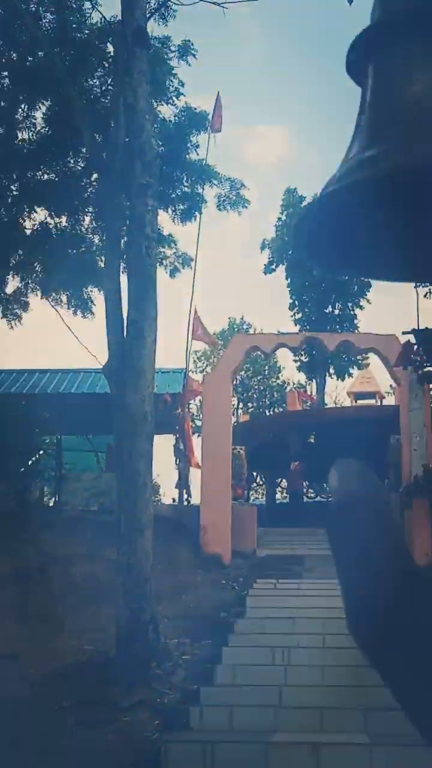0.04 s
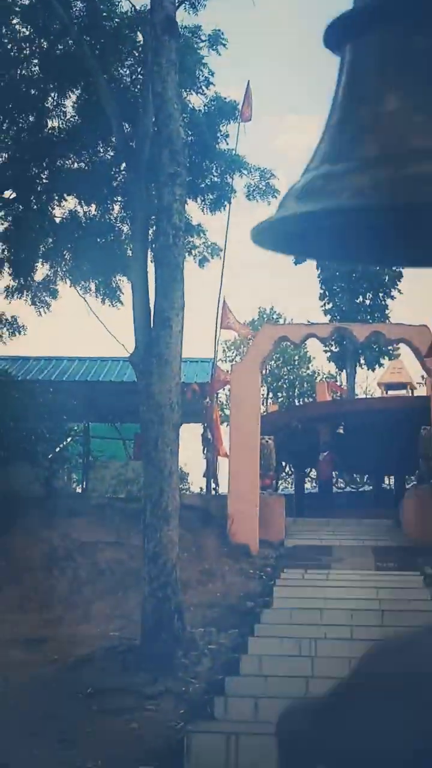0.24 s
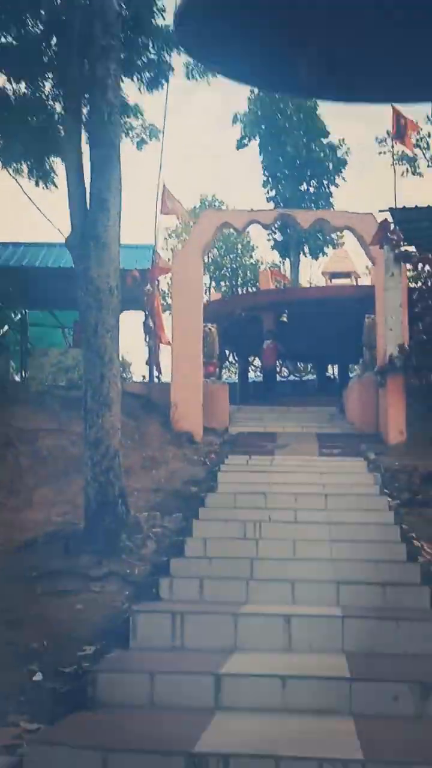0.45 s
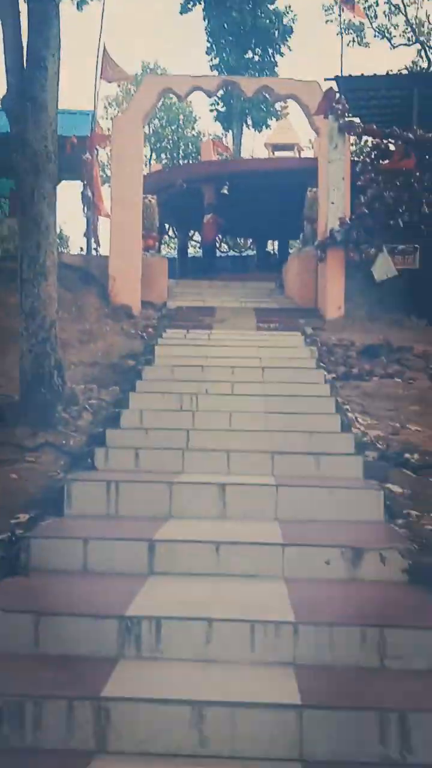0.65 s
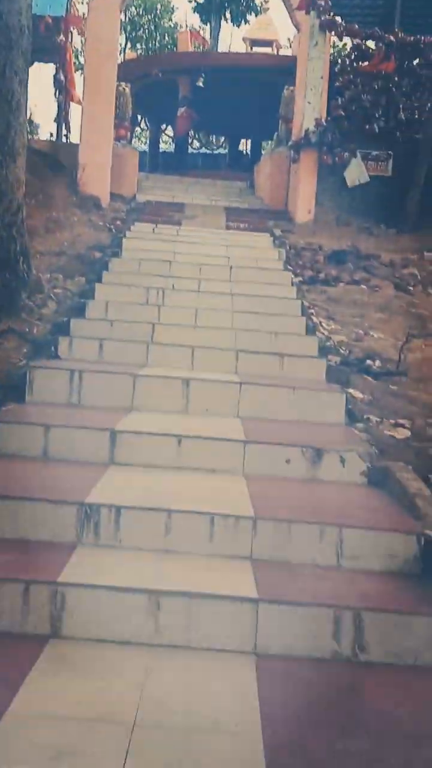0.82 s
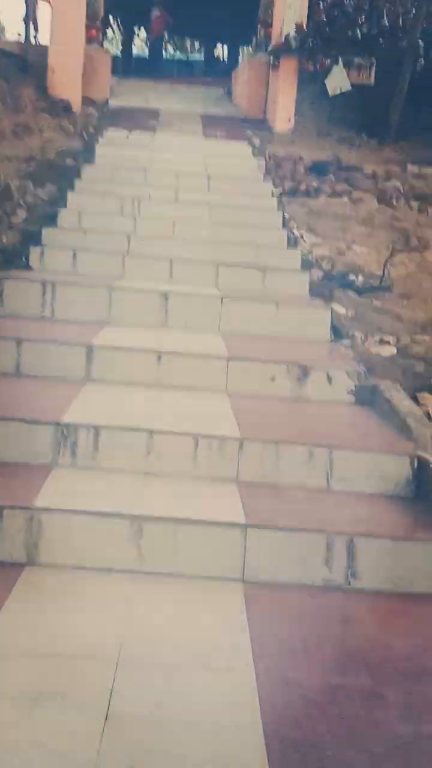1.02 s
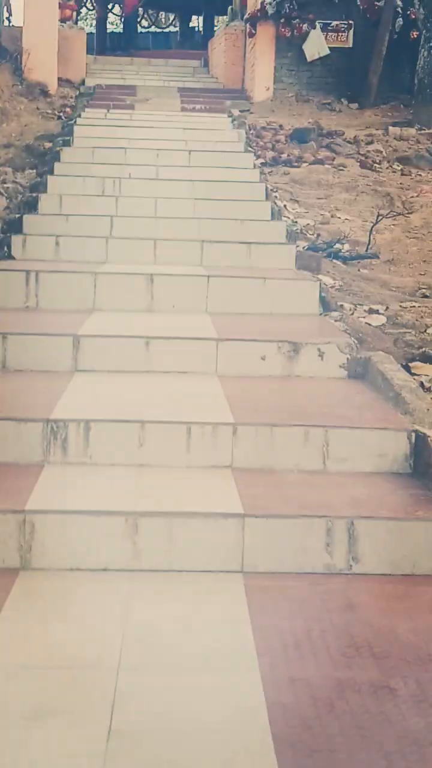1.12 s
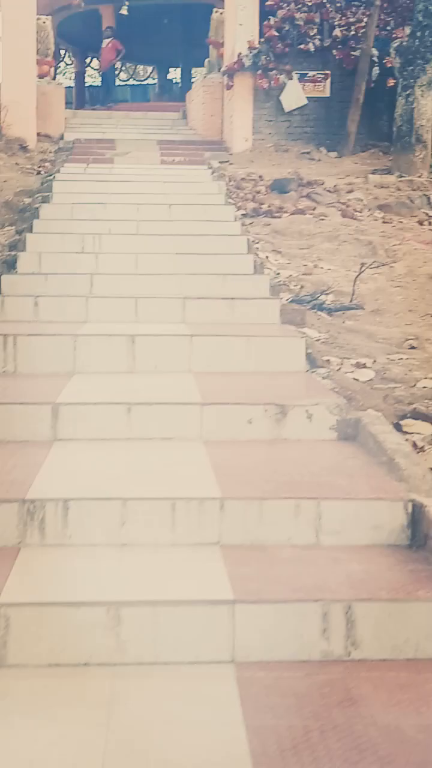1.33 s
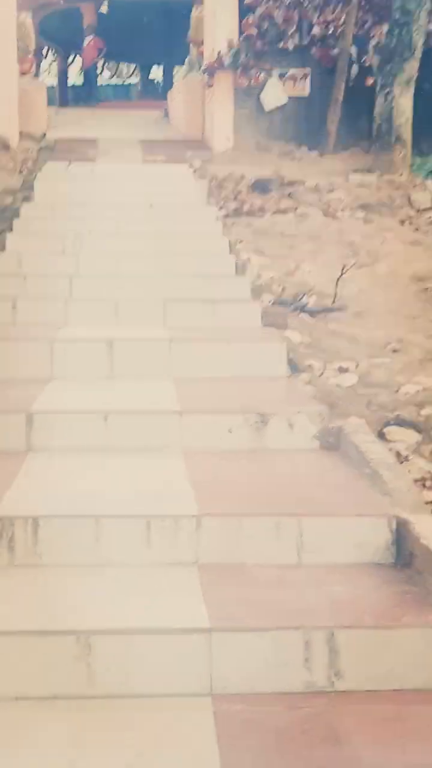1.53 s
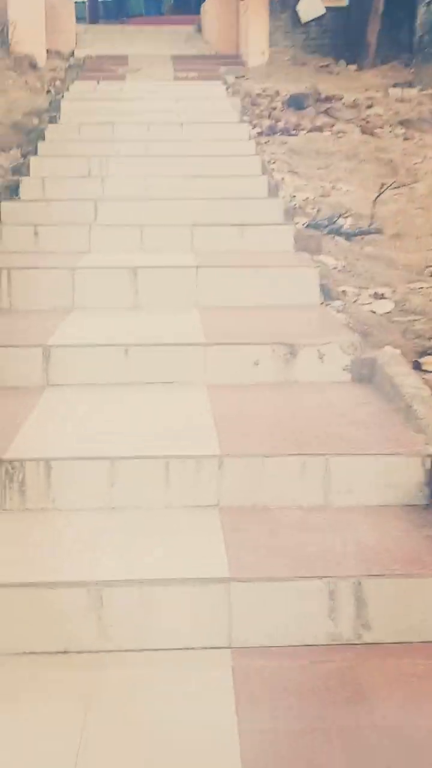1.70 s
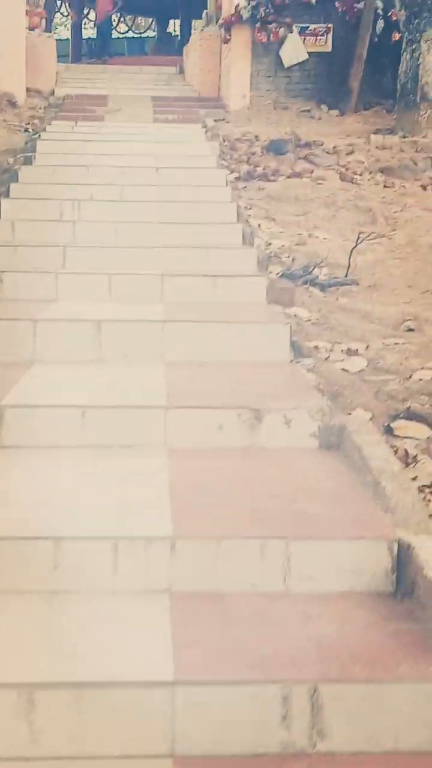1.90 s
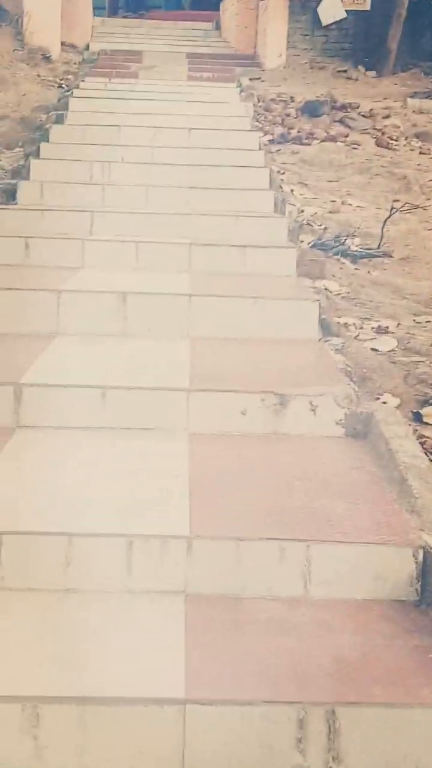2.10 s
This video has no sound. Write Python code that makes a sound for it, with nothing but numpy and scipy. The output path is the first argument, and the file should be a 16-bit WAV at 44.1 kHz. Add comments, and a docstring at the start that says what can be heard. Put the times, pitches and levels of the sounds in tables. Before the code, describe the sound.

At about 0.2 seconds a large hanging metal bell is struck once, so close that the microphone briefly overloads with a harsh rasp. Bright, throbbing tones ring until about 0.9 seconds, then a lower tone swells near 1.2 seconds and slowly fades. Faint wind and a few soft scuffs on stone lie underneath in the quiet open air, one sharper at 1.7 seconds. Quick microphone bumps come around 2.1 seconds.

```python
"""A large hanging temple bell is struck once, right beside a hand-held microphone that overloads.
The overload adds a harsh rasp and some short-lived distortion tones at the strike. The bell swings on:
its paired tones throb, bend in pitch, and swell and fade as it turns and is left behind.
Thin echoes, a few soft scuffs on stone, low wind and some bumps on the microphone sound
in the quiet open air."""
import sys
import numpy as np
from scipy import signal
from scipy.fft import rfft, irfft
from scipy.io import wavfile

SR = 44100
rng = np.random.default_rng(int(sys.argv[2]) if len(sys.argv) > 2 else 0)


def waveform_to_disk(signal):
    """Save audio, clipped to [-1, 1], as 16-bit WAV at the path in sys.argv[1]."""
    frames = np.transpose(np.atleast_2d(signal))
    scaled = np.clip(frames, -1, 1) * 32767
    samples = np.round(scaled).astype(np.int16)
    wavfile.write(sys.argv[1], SR, samples)


N = 94815

STRIKE_S, ATTACK_S = 0.23, 0.0021  # when the bell is struck, and how long the sound takes to rise


def amp(db):
    """Turns decibels (dB) into a number to multiply by."""
    return 10 ** (np.asarray(db) / 20)


def evened(x):
    """Scales a sound to an average (rms) strength of one."""
    return x / np.sqrt(np.mean(x ** 2) + 1e-20)


def curve(points, at):
    """Joins the points by straight lines."""
    return np.interp(at, *np.transpose(points))


def ramp(age, rise):
    """Climbs from 0 to 1 in `rise` seconds, then stays there."""
    return np.clip(age / rise, 0, 1)


def noise(spectrum):
    """Noise shaped by rows of frequency in Hz and relative level in dB."""
    hz, db = np.transpose(spectrum)
    gain = amp(np.interp(np.log(np.fft.rfftfreq(N, 1 / SR) + 1), np.log(hz), db))
    return evened(irfft(rfft(rng.standard_normal(N)) * gain, N))


def band(x, low_hz, high_hz, order=3):
    """Keeps the part of a sound between two frequencies."""
    return signal.sosfilt(signal.butter(order, [low_hz, high_hz], "band", fs=SR, output="sos"), x)


def outdoors(t):
    """A faint wash of air, a far whistle that fades at once, and gusty wind at the microphone."""
    # The tone of the air and of the wind. Each row: frequency in Hz, relative level in dB.
    air_tone = [(25, -20), (80, 3.5), (200, -2), (500, -8.5), (1000, -10), (1600, -15.5), (2300, -7.5),
                (3300, -12), (4500, -22.5), (6000, -36.5), (16000, -34.5)]
    wind_tone = [(20, -34), (50, -10), (90, 3), (140, -4), (250, -18), (600, -42.5), (2000, -69.5)]
    # How loud each is, gusts aside. Each row: time in seconds, level in dB.
    air_level = [(0, -56), (.2, -54), (.42, -63), (.8, -62), (1.15, -60.5), (1.4, -59), (2.1, -59.5)]
    wind_level = [(0, -67), (.15, -57.5), (.3, -62), (.47, -67.5), (.63, -61), (.9, -67.5), (1.0, -60),
                  (1.33, -56), (1.52, -66.5), (2.02, -56), (2.12, -34)]
    gust_db = 3 * noise([(1, 0), (12, 0), (30, -40), (100, -100)])
    whistle = evened(band(rng.standard_normal(N), low_hz=3080, high_hz=3480))
    whistle *= amp(-49.5) * (1 - ramp(t, 0.058))
    air = amp(curve(air_level, t)) * noise(air_tone)
    wind = amp(curve(wind_level, t) + gust_db) * noise(wind_tone)
    return air + whistle + wind


def bell(t):
    """The bell's ringing tones and a few distortion tones at the strike, all bent in pitch."""
    # How loud each named group of tones is as the bell turns. Each row: time in seconds, level in dB.
    group_levels = {"low": [(0.24, -28), (0.48, -34.5), (0.55, -31), (0.66, -27.5), (0.78, -18),
                    (0.88, -24.5), (0.98, -22.5), (1.08, -29), (1.17, -14), (1.26, -11.5), (1.43, -18),
                    (1.55, -17.5), (1.73, -22.5), (1.82, -29), (1.97, -27.5), (2.13, -48)],
                    "low twin": [(0.24, -36), (0.5, -42.5), (0.78, -36), (0.94, -30.5), (1.07, -42.5),
                    (1.24, -26.5), (1.39, -38), (1.6, -28.5), (1.85, -32.5), (2.14, -36.5)],
                    "upper": [(0.24, -12.5), (0.35, -16), (0.49, -23.5), (0.65, -23.5), (0.78, -19.5),
                    (0.95, -24), (1.04, -35.5), (1.12, -27.5), (1.35, -42.5), (1.6, -52), (1.8, -68),
                    (2.14, -86.5)], "main": [(.24, -6), (.275, -2), (.335, -6.5), (.44, -10.5), (.7, -9),
                    (.83, -13), (.9, -11.5), (.96, -36.5), (1.04, -36.5), (1.12, -38), (1.16, -22),
                    (1.207, -31), (1.245, -22.5), (1.4, -33.5), (1.55, -38), (1.66, -34), (1.76, -38),
                    (1.81, -52.5), (1.85, -41.5), (2.14, -48)], "bright": [(.24, -18), (.34, -19.5),
                    (.41, -29), (.65, -26.5), (.82, -34.5), (.93, -53), (1.01, -44), (1.08, -60),
                    (1.13, -53.5), (1.2, -63.5), (1.5, -72), (2.14, -87)], "top": [(.24, -10), (.262, -14),
                    (.29, -7.5), (.322, -22.5), (.365, -14.5), (.43, -26.5), (.53, -28.5), (.72, -39.5),
                    (.85, -52.5), (1.3, -72), (2.14, -100)]}
    # The bell's lasting tones. Each row: group, pitch in Hz, level within the group in dB,
    # extra fading in dB per second.
    lasting_tones = [("low", 1392.4, 0, 0), ("low twin", 1369.6, 0, 0), ("main", 2849.6, 0, 0),
                     ("upper", 3143.5, 0, 0), ("upper", 3185, -9, 11), ("bright", 4245, 0, 0),
                     ("bright", 4279, 0, 17), ("top", 4312, -9, 10), ("top", 4330, 0, 0),
                     ("top", 4339, -14, -10)]
    # Short-lived tones at the strike: some from the bell, some distortion tones from the overloaded
    # microphone. Each row: pitch in Hz, level in dB, seconds to fade by 60 dB.
    short_tones = [(1104, -54.5, 1.6), (1190, -36, 0.51), (1486, -35.5, .55), (1920, -24.5, 0.29),
                   (2020, -34.5, .3), (3390, -35, 0.28), (4538, -35.5, 0.23), (5930, -57, 1.6),
                   (6284, -18, .23), (6960, -25, .2), (7176, -55.5, 1.3), (8694, -43, 0.5),
                   (10560, -45, .38), (11410, -53, .36), (13420, -57.5, .35), (14450, -48.5, .35)]
    age = np.maximum(t - STRIKE_S, 0)
    # Pitch rises as the bell swings closer and falls as it swings away (the Doppler effect).
    swing_s, fastest_approach_s, pitch_share = 1.36, .7, .0015
    clock = np.cumsum(1 + pitch_share * np.cos(2 * np.pi * (t - fastest_approach_s) / swing_s)) / SR
    # A twin tone just below the main one makes it throb, deeply at first.
    beat_hz, dip_s, early_depth, late_depth, settle_s = 7.95, 0.2554, .9, 0.29, 0.28
    depth = late_depth + (early_depth - late_depth) * np.exp(-age / settle_s)
    beat = (1 - depth * np.exp(-2j * np.pi * beat_hz * (t - dip_s))) / np.sqrt(1 + depth ** 2)
    out = np.zeros(N)
    for group, hz, db, fade_db in lasting_tones:
        tone = np.exp(2j * np.pi * (hz * clock + rng.random())) * waver(hz)
        if group == "main":
            tone *= beat
        out += amp(curve(group_levels[group], t) + db - fade_db * age) * tone.real
    for hz, db, fade_s in short_tones:
        tone = waver(hz) * np.exp(2j * np.pi * (hz * clock + rng.random()))
        out += amp(db - 60 * age / fade_s) * tone.real
    return out * ramp(age, ATTACK_S)


def waver(hz):
    """Reflections make a tone waver, more if it is high and more once the bell is left behind."""
    near_depth, far_depth, max_depth = 0.11, 0.48, .4
    leaving_s, leaving_takes_s = .8, 0.13
    height = hz / 3000  # pitch compared with 3000 Hz
    rates_hz = 9 * np.sqrt(height) * rng.standard_normal(12)  # one for each reflection
    t = np.linspace(0, N / SR, 600)
    turns = rates_hz[:, None] * t + rng.random((len(rates_hz), 1))
    reflections = np.exp(2j * np.pi * turns).sum(0) / np.sqrt(len(rates_hz))
    depth = near_depth + (far_depth - near_depth) * ramp(t - leaving_s, leaving_takes_s)
    depth = np.minimum(depth * height ** 2.3, max_depth)
    return np.interp(np.arange(N) / SR, t, (1 + depth * reflections) / np.sqrt(1 + depth ** 2))


def overload_rasp(t):
    """The harsh, rough rasp of the overloaded microphone at the strike, with smeared pitches in it."""
    # The tone of the rasp's noise. Each row: frequency in Hz, relative level in dB.
    noise_tone = [(30, -27), (70, -9.5), (200, 2.5), (450, 0), (1000, -3.5), (2500, -1), (4000, -4.5),
                  (5500, -21.5), (10000, -26.5), (16000, -31.5)]
    # Smeared pitches in the rasp. Each row: pitch in Hz, relative level in dB.
    smeared_tones = [(259, -16), (403, -17), (563, -16), (726, -18.5), (911, -13), (1470, -21), (1679, -20),
                     (2410, -18.5), (2639, -21)]
    # How loud the whole rasp is. Each row: time in seconds, level in dB.
    rasp_level = [(.232, -9), (.248, -6.5), (.254, -12), (.257, -5), (.262, -14), (.272, -14.5),
                  (.281, -11.5), (.304, -17.5), (.315, -43), (.366, -44.5), (.385, -62)]
    blur_hz = 10.34  # how widely random drift smears each pitch
    out = amp(-2.5) * noise(noise_tone)
    for hz, db in smeared_tones:
        drift = np.cumsum(rng.standard_normal(N)) * np.sqrt(2 * np.pi * blur_hz / SR)
        out += amp(db) * np.sqrt(2) * np.sin(2 * np.pi * hz * t + drift)
    end_s = rasp_level[-1][0]
    return out * amp(curve(rasp_level, t)) * ramp(t - STRIKE_S, ATTACK_S) * (t < end_s)


def yard_echoes(x):
    """Sound bounces back from steps, trees and walls as thin, scattered echoes."""
    echo_db, fade_db_per_s = -23, 60
    t = np.arange(SR) / SR
    echoes = rng.standard_normal(SR) * (rng.random(SR) < .05)
    echoes *= (t > .012) * amp(-fade_db_per_s * t)
    return amp(echo_db) * signal.fftconvolve(x, echoes / np.linalg.norm(echoes))[:N]


def bumps(t):
    """Each bump on the microphone is a low push that dies away almost at once."""
    # The bumps. Each row: start in seconds, level in dB, pitch in Hz, fading time in seconds.
    pushes = [(0.357, -39, 81, 0.0094), (.615, -45, 128.8, .006), (1.209, -41.5, 110, 0.0034),
              (1.659, -42, 85, 0.0079), (1.877, -34, 156.8, 0.0048), (2.083, -37.5, 120, 0.009),
              (2.1081, -18.5, 192, 0.0015), (2.1259, -16, 228.5, 0.0015), (2.1455, -14.5, 239, 0.0017)]
    out = np.zeros(N)
    for start, db, hz, fade_s in pushes:
        age = np.maximum(t - start, 0)
        swell = age / fade_s * np.exp(1 - age / fade_s)
        out += amp(db) * swell * np.sin(2 * np.pi * hz * age)
    return out


def scuffs(t):
    """Scuffs on stone: short gritty puffs with a faint tail, each a mix of four bands of noise."""
    # The bands, low to high: knock, body, grit, tick. Each row: lower edge in Hz, upper edge in Hz.
    band_edges = [(380, 660), (700, 1150), (1650, 2900), (3300, 5500)]
    # The scuffs. Each row: start in seconds, fading time in seconds,
    # then the levels of knock, body, grit and tick in dB.
    puffs = [(0.604, .016, -78, -57.5, -61.5, -88), (.789, .013, -67.5, -49, -59, -54.5),
             (.923, .014, -66, -50, -49.5, -76), (1.039, .01, -86, -73, -56.5, -83.5),
             (1.3, 0.023, -74.5, -60.5, -63.5, -68), (1.7289, 0.0065, -33, -48.5, -33.5, -51)]
    rise_s, tail_db, tail_s = 0.001, -18, .028
    noises = np.array([evened(band(rng.standard_normal(N), *edges, order=5)) for edges in band_edges])
    out = np.zeros(N)
    for start, fade_s, *band_dbs in puffs:
        age = np.maximum(t - start, 0)
        fade = np.exp(-age / fade_s) + amp(tail_db) * np.exp(-age / tail_s)
        out += (amp(band_dbs) @ noises) * ramp(age, rise_s) * fade
    return out


def scene():
    """The bell with its echoes, the overload's rasp, and the small sounds around them."""
    t = np.arange(N) / SR
    ring = bell(t)
    return (ring + yard_echoes(ring) + overload_rasp(t) + scuffs(t) + bumps(t) + outdoors(t))[None]


def record(dry):
    """The microphone bends the wave slightly, overloads on the blow and loses the highest treble."""
    lopsided_share, ceiling, hardness, top_hz = .12, 0.97, 14, 15500
    # Squaring adds faint new tones at the differences between the bell's pitches.
    bent = dry + lopsided_share * band(dry ** 2, low_hz=336, high_hz=1700)
    clipped = bent / (1 + np.abs(bent / ceiling) ** hardness) ** (1 / hardness)
    treble_cut = signal.firwin(511, top_hz, window=("kaiser", 9), fs=SR)
    return signal.oaconvolve(clipped, treble_cut[None], "same")


dry = scene()
out = record(dry)
waveform_to_disk(out)
```